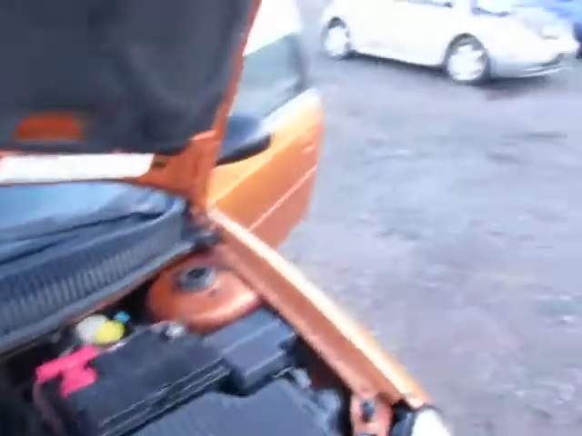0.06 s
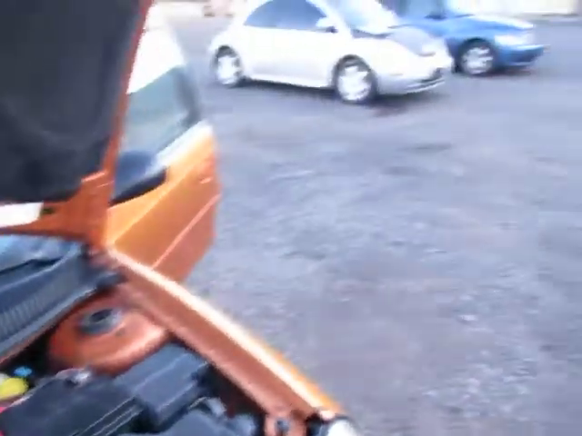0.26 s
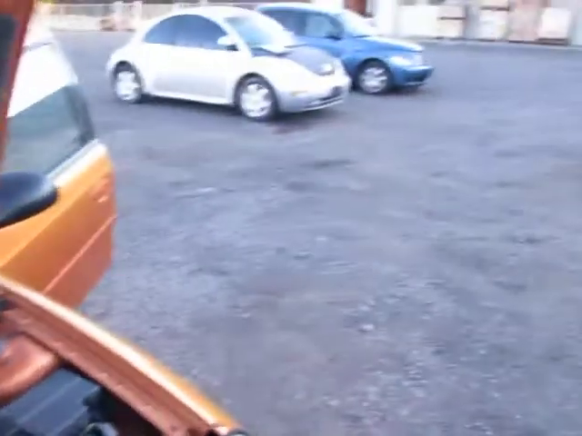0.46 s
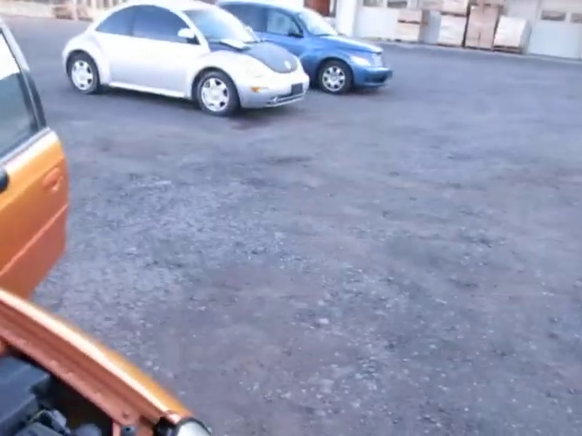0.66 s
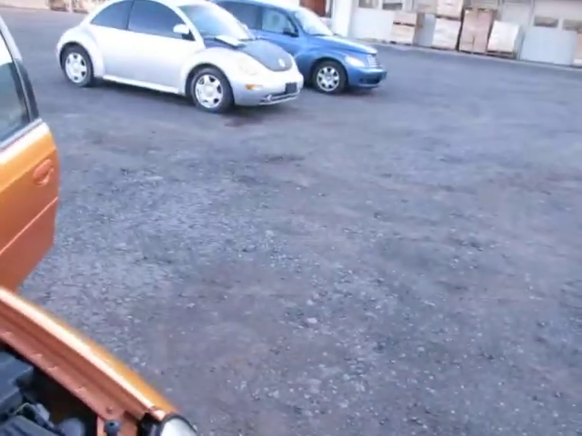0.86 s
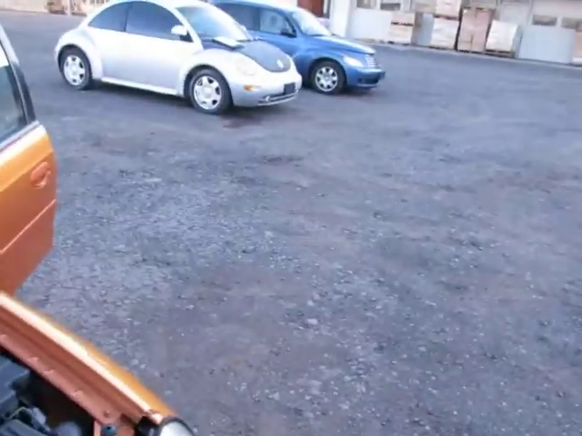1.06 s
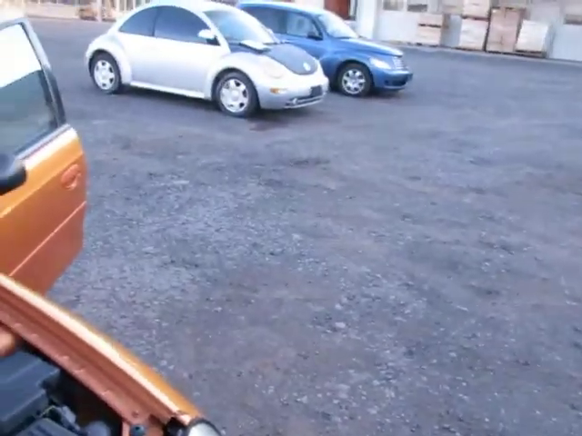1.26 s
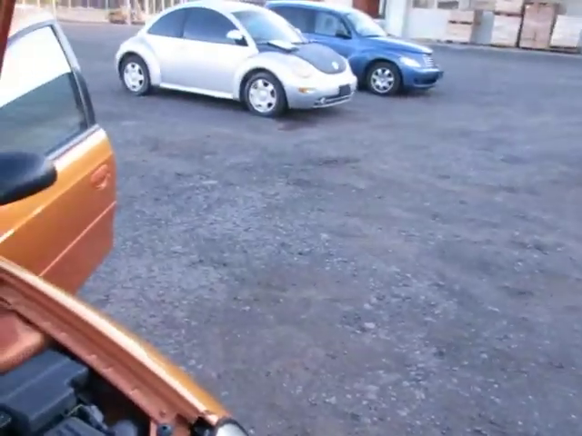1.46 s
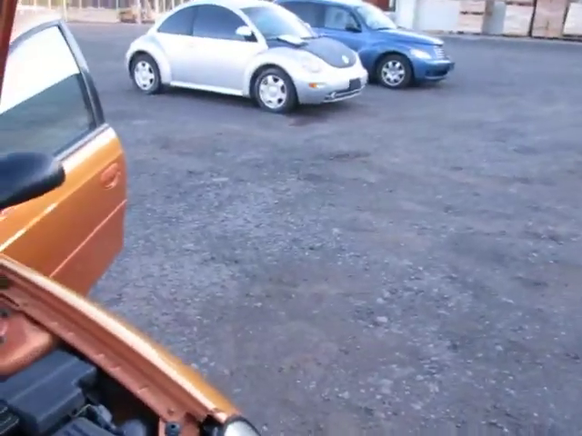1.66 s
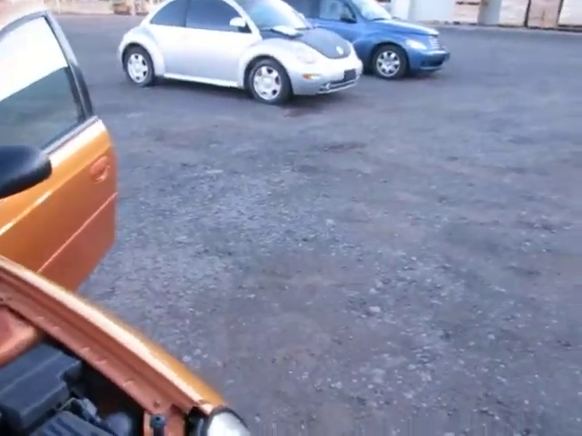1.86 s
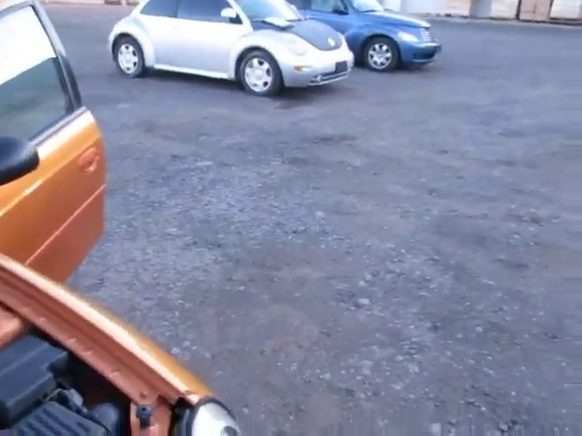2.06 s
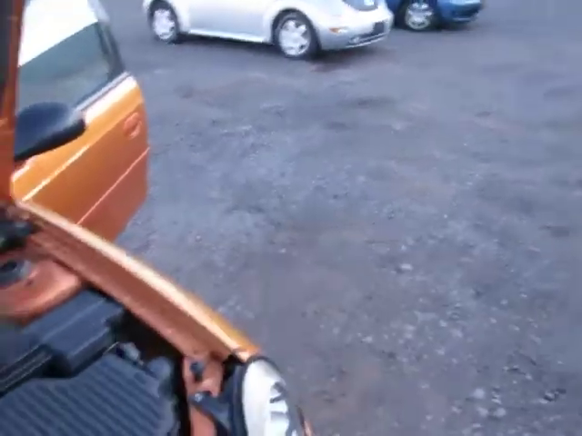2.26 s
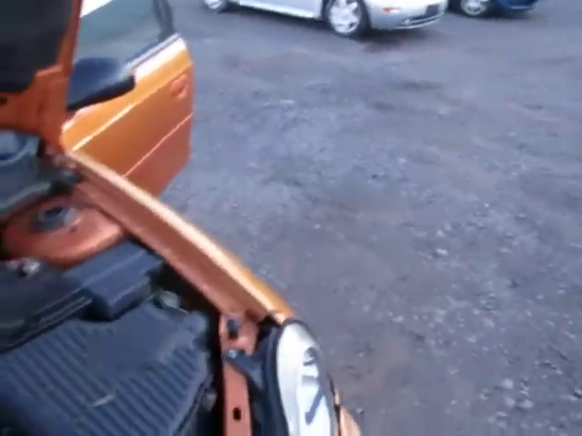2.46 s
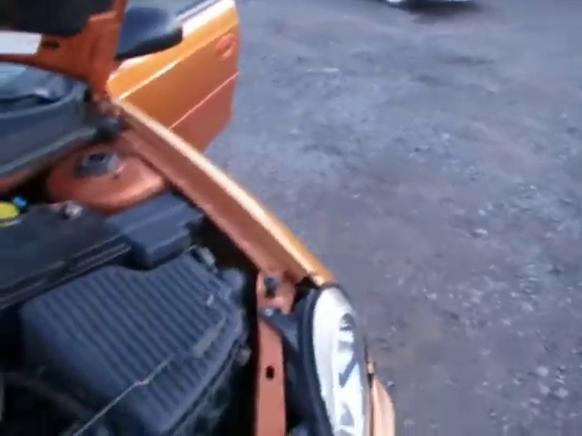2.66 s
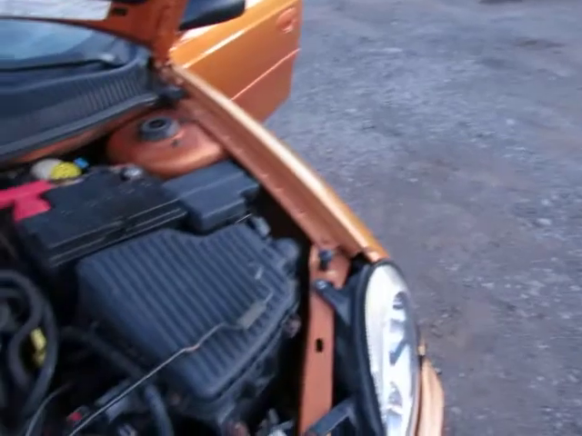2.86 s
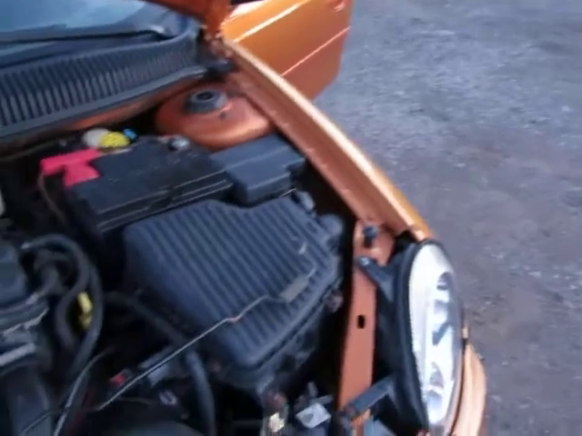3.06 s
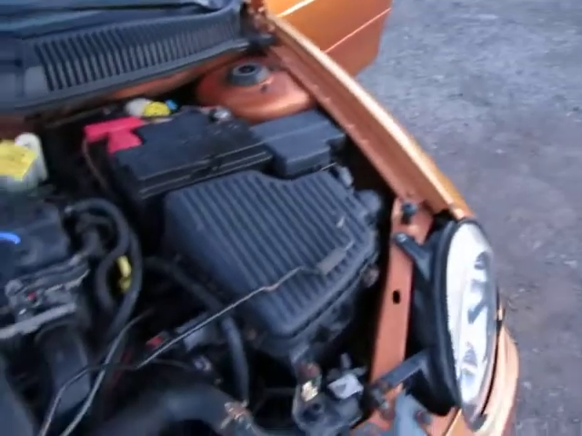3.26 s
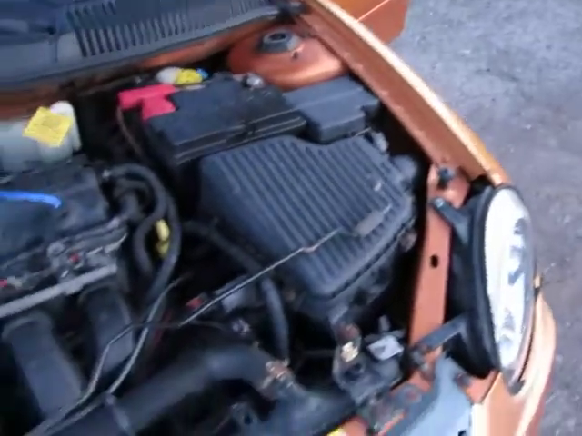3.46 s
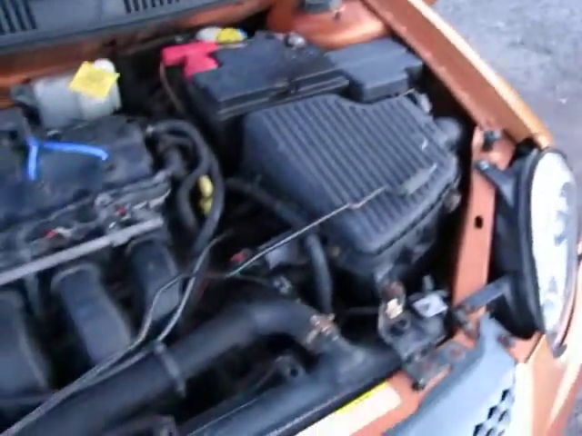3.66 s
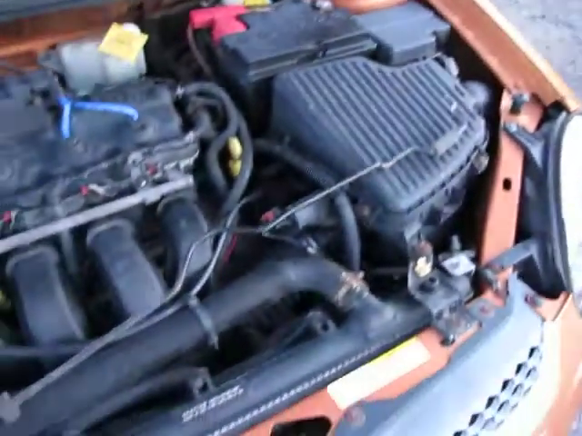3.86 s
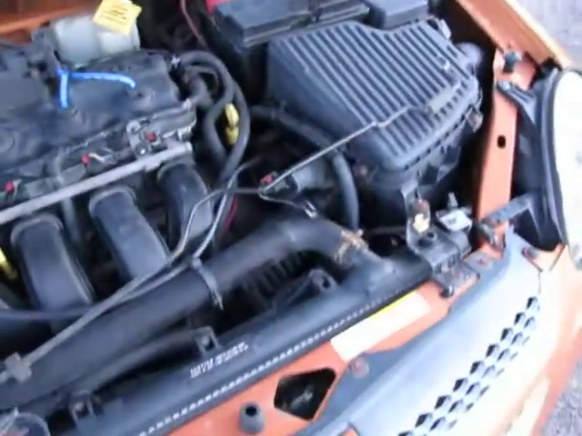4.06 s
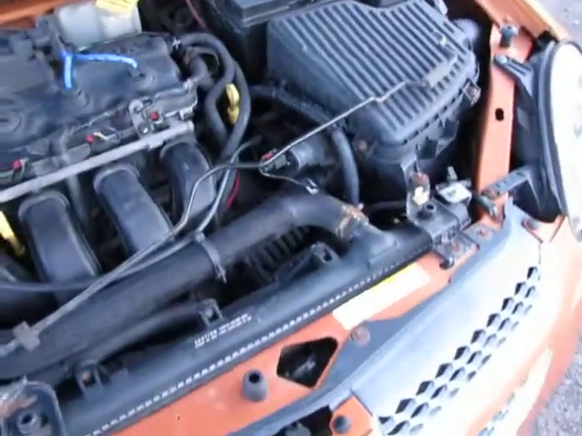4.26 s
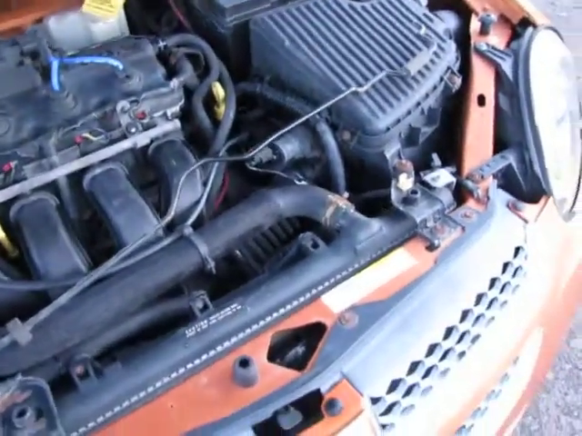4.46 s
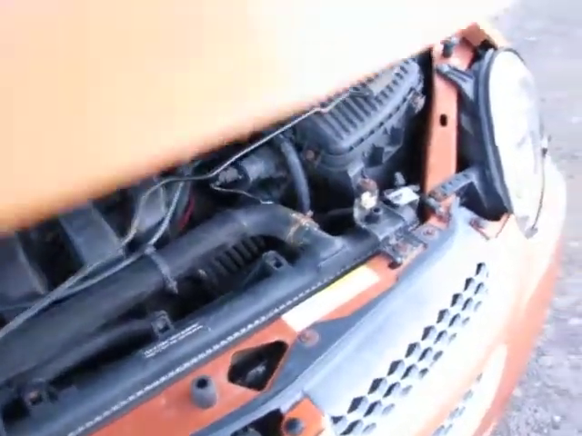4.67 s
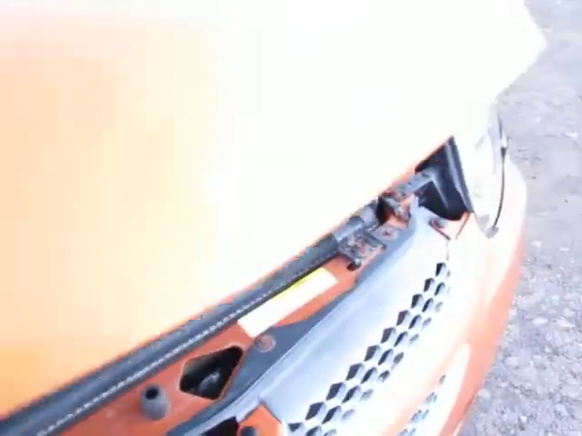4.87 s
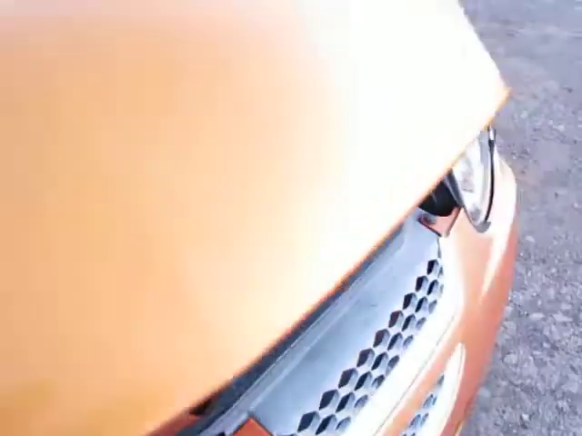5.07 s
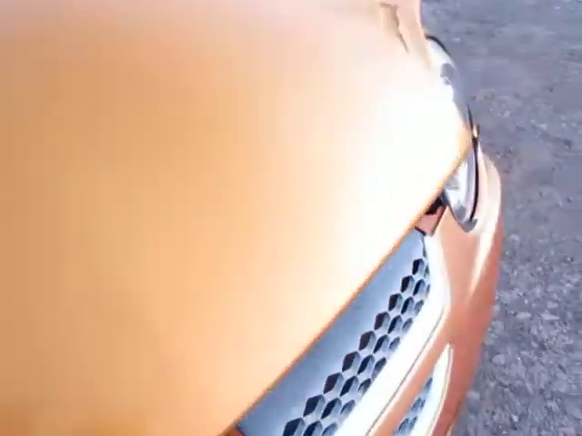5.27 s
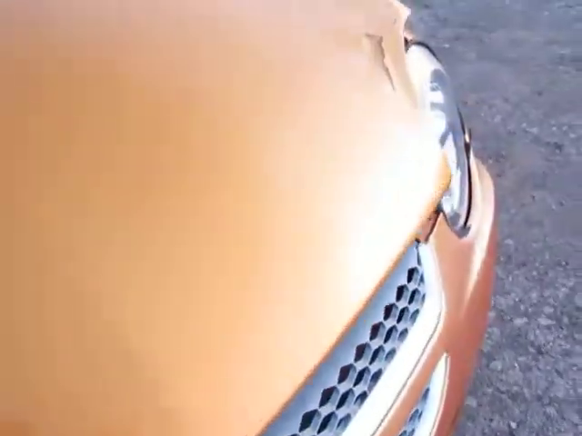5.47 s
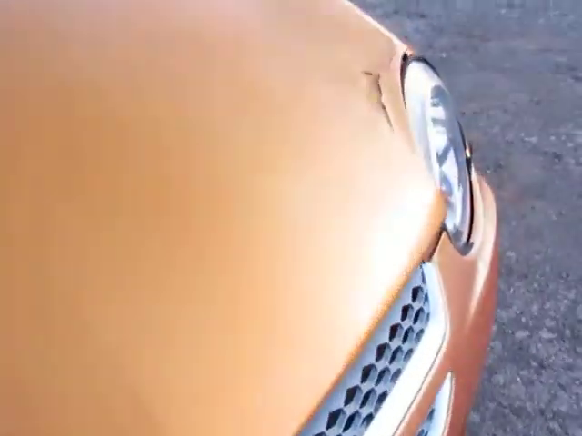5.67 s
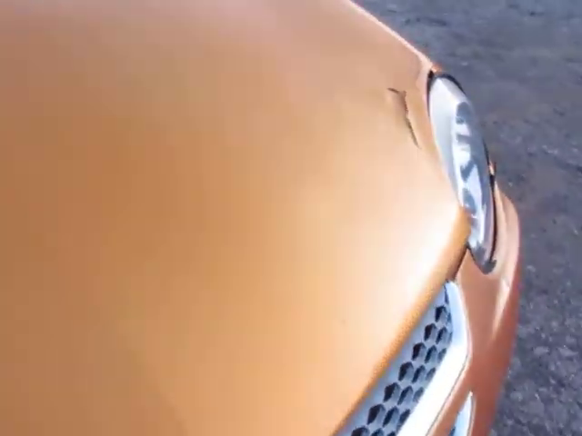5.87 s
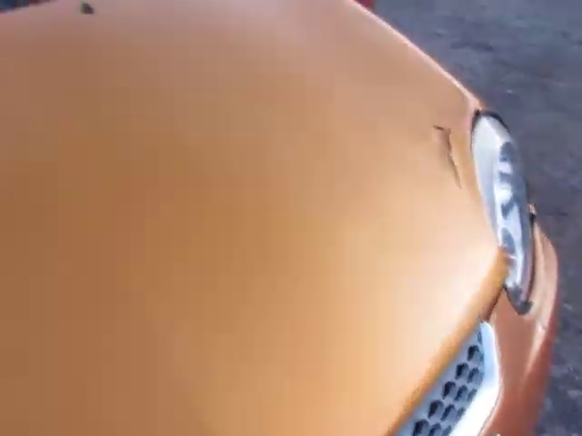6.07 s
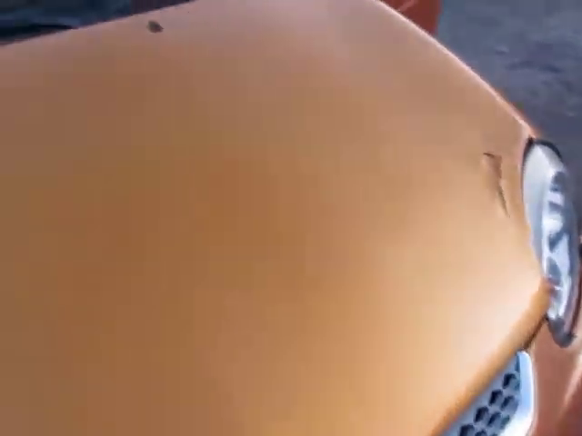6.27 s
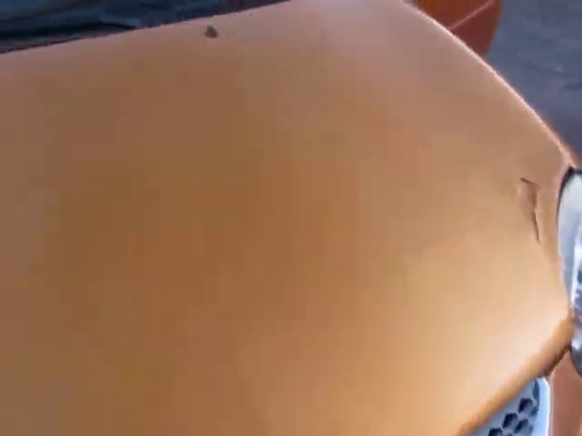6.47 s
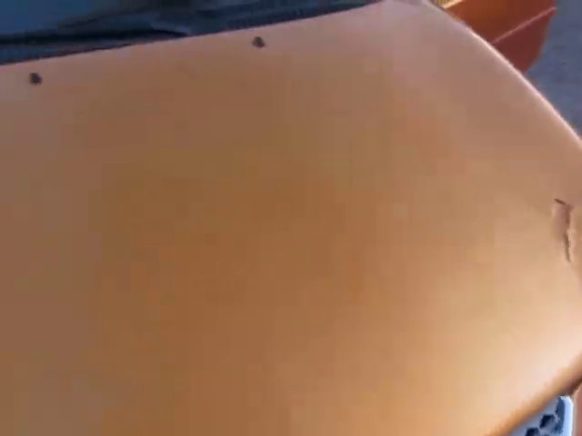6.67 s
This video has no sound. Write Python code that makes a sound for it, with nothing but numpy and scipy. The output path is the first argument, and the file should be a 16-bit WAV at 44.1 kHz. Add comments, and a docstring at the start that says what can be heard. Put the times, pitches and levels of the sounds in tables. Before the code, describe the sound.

Outdoors in a yard, a small four-cylinder engine idles steadily, close to a hand-held stereo microphone. Its rough, airy hum carries about 28 quick firing pulses a second, fine bright ticks, faint fan tones and soft exhaust throb, over uneven low rumble. A light hand knock comes at 0.7 s and a duller bump at 1.14 s. At 2.3 s the metal prop rod hits its holder with a sharp double clack, strikes again at 2.64 s and bounces faster and duller until about 2.95 s. The idle drops away at the clack, then climbs back over a second or so, ticks clearer facing the bay. Soft low knocks follow around 3.4-3.6 s. From 4.55 to 5 s the lowering bonnet muffles the engine. At 5.52-5.62 s it latches with rapid hard clacks and a hollow sheet-metal boom; the muffled idle dips deeply and is swelling back by 6.7 s.

```python
"""A four-cylinder engine idles in a yard: coloured noise, injector and valve ticks, fan tones, exhaust thumps.
Low rumble lies under it; hands knock and bump the hand-held camera, which turns from beside the bay to face it.
The bonnet prop drops into its holder and bounces: blows and rattle excite the rod's modes, with bright cracks.
The bonnet is lowered, muffling the engine, then latches with clacks and a boom.
At set times around the blows engine and rumble dip fast, then climb back steadily."""
import sys
import numpy as np
from scipy import signal
from scipy.fft import rfft, irfft, next_fast_len
from scipy.io import wavfile
from scipy.ndimage import uniform_filter1d, map_coordinates

SR = 44100
rng = np.random.default_rng(int(sys.argv[2]) if len(sys.argv) > 2 else 0)


def dump_mix(stems):
    """Bounce the given channels to the path in sys.argv[1] as a 16-bit WAV at rate SR."""
    frames = np.atleast_2d(stems).T  # one column per channel
    limited = np.clip(frames, -1, 1)  # hard clip at full scale
    pcm = np.round(limited * 32767).astype(np.int16)
    wavfile.write(sys.argv[1], SR, pcm)


def voltage_ratio(decibels):
    """Convert decibels (scalar or array-like) to amplitude ratios, 20 dB per decade."""
    exponent = np.asarray(decibels, float) / 20
    return 10 ** exponent


N = 296345
T = np.arange(N) / SR
FRAME, TOP_HZ = 1024, 16500

# camera and bonnet: (time [s], pose [0 beside bay, 1 facing it, 2 bonnet down, 3 latched])
POSE = [(0, 0), (2.3, .1), (2.6, .5), (3.5, .7), (4.0, 1), (4.55, 1), (4.78, 1.7), (5.0, 1.95), (5.45, 2),
        (5.8, 2.8), (6.1, 3), (6.72, 3)]
# microphone ports: (frequency [Hz], likeness [0-1], left lead beside bay [rad], left lead facing [rad],
# left over right beside bay [dB], left over right facing [dB])
PORTS = [(100, .4, 0, 0, 2, 0), (170, .9, 0, -.2, 2, 1), (400, .97, .3, .15, 2, 1),
         (1000, .88, 1.2, .3, 6.5, 2), (2000, .65, 1.6, .6, 6, 1), (2900, .5, 2.1, .9, 3.5, 0),
         (4000, .25, 2.6, .8, 4.5, 4), (5400, .3, 1.7, .5, 6.5, 5.5), (6700, .45, 2.6, 1, 7.5, 2),
         (8200, .5, 3, 1.8, 5, 1), (12000, .6, 3.8, 3, 2.5, 1), (14500, .5, 5.3, 4, 1.5, 0)]

# engine noise spectrum: (frequency [Hz], density in pose 0, 1, 2, 3 [dB, relative])
ENGINE_COLOUR = [(67, -20, -32, -28, -38), (123, -7, -4, -1.5, -1.5), (154, -1.5, -5, -6, -2),
                 (209, -7.5, -5, -3.5, -6), (364, -3.5, -1.5, 4, 1), (430, -6, -12, -7, -11.5),
                 (700, -9.5, -4.5, -6, -12), (880, -5, -8.5, -7, -8), (1690, -5.5, -3.5, -7, -8),
                 (2190, -10, -9, -12, -16), (2900, -13, -11, -12, -15), (3320, -12.5, -12, -11.5, -16),
                 (4320, -16.5, -14.5, -19.5, -23), (6370, -18.5, -16, -23, -26.5),
                 (8240, -18.5, -16.5, -25, -29.5), (9200, -23, -18.5, -27, -34),
                 (11700, -24.5, -20.5, -32, -35), (12400, -25.5, -17.5, -23, -32),
                 (14600, -27, -25, -32, -38), (17200, -43, -43, -41, -46)]
# hollows of intake and bay: (frequency [Hz], width [Hz], boost with bonnet open [dB])
BAY_HOLLOWS = [(264, 19, 5.5), (1148, 30, 10), (1241, 38, 6.5), (1474, 31, 8.5), (1593, 22, 6),
               (1534, 51, 3), (6880, 120, 5)]
# gain on all engine parts: (pose 0, 1, 2, 3 [dB])
ENGINE_POSE_DB = [-22, -23, -29, -29]
# injector ticks: (strength of each cylinder [dB, relative])
INJECTOR_DB = [11, 4, 5, 7]
# injector tick filter: (frequency [Hz], gain [dB])
INJECTOR_COLOUR = [(3000, -40), (7000, -28), (10000, -5), (13000, -1.5), (15500, -24)]
# valve seat filter: (frequency [Hz], gain [dB])
VALVE_COLOUR = [(1200, -30), (2500, 17), (5000, -3.5), (8000, 4), (12000, -23), (16000, -34)]
# fan blade tones and a belt-drive whine: (frequency [Hz], level [dB, before the pose gains])
FAN_TONES = [(175.7, -10), (352.5, -17), (527.3, -13.5), (703, -18.5), (1126, -19.5)]
# gain on the fan tones: (pose 0, 1, 2, 3 [dB])
FAN_POSE_DB = [-0.5, 1, 5.5, 1]

# air and hands at the ports: (time [s], level [dB, before a 13.5 dB lift])
RUMBLE_LEVEL = [(0, -53), (.5, -78), (1.1, -40.5), (1.7, -60), (2.4, -55), (3.6, -40), (4.1, -50),
                (4.8, -54), (5.45, -43), (6.0, -41), (6.72, -48)]
# rumble filter: (frequency [Hz], gain [dB])
RUMBLE_COLOUR = [(18, -25), (30, -23), (45, -4.5), (90, -5.0), (130, -12.5), (200, -67)]
# opposed share of the rumble: (pose 0, 1, 2, 3 [ratio])
RUMBLE_OPPOSED = [0.23, 0.97, 0.3, 0.63]

# hand knocks, and extra low, ringing or snapping bands within the rod and latch blows:
# (time [s], level [dB, relative], frequency [Hz], t60 [s])
KNOCK_BANDS = [(.704, -17, 620, .098), (2.302, -17.5, 694, 0.33), (2.348, 3, 2080, .014),
               (2.66, -34, 880, 0.45), (2.947, -30, 750, 0.28), (3.414, -12, 110, 0.2),
               (3.56, -16, 93, 0.18), (5.466, -38, 248, .26), (5.6192, -25.5, 3900, 0.04),
               (5.665, -47.5, 7000, .12)]
# bands of a hand bump on the camera: (frequency [Hz], level [dB, relative], t60 [s])
BUMP_BANDS = [(130, -12, 0.46), (330, -15, 0.34), (626, -13, 0.1), (3970, -20, .03)]
# bonnet sheet after each latch contact: (frequency [Hz], level [dB re the contact's ring column], t60 [s])
BOOM_BANDS = [(94, -18, .25), (320, -18, .75), (620, -19, .45)]
# dips of engine and rumble: (time [s], further depth [dB])
DIPS = [(.72, 2.5), (1.14, 5), (2.3, 6), (2.348, 20), (2.65, 1.5), (2.77, 1.5), (5.57, 21)]

# prop rod strikes: (time [s], ring [dB, relative], crack [dB, relative])
ROD_STRIKES = [(2.297, -19, 0), (2.3471, -1, 1.5), (2.644, -3.5, -0.5)]
# prop rod decay: (ring t60 [s], crack t60 [s])
ROD_T60_S = [.04, .02]
# prop rod modes: (frequency [Hz], width [Hz], gain [dB])
ROD_MODES = [(225, 49, -2.5), (415, 130, -7.5), (656, 52, 2.5), (828, 95, -1.5), (1065, 74, -2.5),
             (1720, 170, -7.5), (2200, 310, -13), (2920, 230, -12.5), (4500, 170, -26), (5970, 390, -35)]
# bonnet latch contacts: (time [s], ring [dB, relative], crack [dB, relative])
LATCH_CONTACTS = [(5.523, -5, -0.5), (5.5597, -11.5, -6.5), (5.565, -9.5, 0), (5.581, -15, -14),
                  (5.596, -27, -39), (5.6191, -19, -17.5)]
# latch decay: (ring t60 [s], crack t60 [s])
LATCH_T60_S = [0.082, 0.039]
# bonnet modes: (frequency [Hz], width [Hz], gain [dB])
BONNET_MODES = [(167, 46, -1), (263, 54, -15), (380, 37, 0.5), (563, 32, -12), (727, 16, 7.5),
                (1180, 110, -2.5), (2900, 290, -7), (3960, 330, -8.5), (6000, 190, -17), (8600, 340, -34)]

CYCLE_S, FIRST_TICK_S, HUNT_S = .14132, .111, .002  # engine cycle, a tick of the loudest injector, idle wander
FACING_TICK_DB = 4.5  # ticks stand out more facing the bay
BUMP_S = 1.1375
DIP_FALL_S, BONNET_DIP_FALL_S = .035, .055
RETURN_DB_PER_S, RETURN_KNEE_DB = 22.5, 6  # climb back, rounding near full level
FLIGHT_S, FLIGHT_RATIO = .125, .665  # first bounce, next flight over the last
BOUNCE_RING_LOSS_DB, BOUNCE_CRACK_LOSS_DB = 5.5, 13.5
REBOUND_S, REBOUND_RING_DB, REBOUND_CRACK_DB = .008, -6.5, -27  # second touch in the holder, dull
CHATTER_S, CHATTER_DB = .026, -21  # free end taps after a hard contact


def unit(x):
    """Bring to rms 1."""
    return x / np.sqrt(np.mean(x ** 2) + 1e-20)


def along(points, hz, axis=1):
    """One column of a table, interpolated on a log frequency axis."""
    table = np.array(points)
    return np.interp(np.log(hz + 1), np.log(table[:, 0] + 1), table[:, axis])


def curve(rows, t=T):
    """Straight lines through (time [s], value) rows."""
    return np.interp(t, *np.transpose(rows))


def by_pose(values):
    """Interpolate four pose values over time."""
    return np.interp(curve(POSE), range(4), values)


def wobble(rate):
    """Smooth random curve, rate knots a second."""
    knots = rng.standard_normal(int(N * rate / SR) + 4)
    return map_coordinates(knots, [T * rate])


def filtered(x, response):
    """Apply a complex response of frequency."""
    m = next_fast_len(N + SR // 2)
    return irfft(rfft(x, m) * response(np.fft.rfftfreq(m, 1 / SR)), m)[..., :N]


def ports(near, diffuse, turned=None):
    """Two ports: a shared part whose lead and balance change with the turn, plus an unlike part."""
    hz, t, (shared, unlike) = signal.stft([near, diffuse], SR, nperseg=FRAME)
    turned = np.clip(curve(POSE, t), 0, 1.25) if turned is None else turned + 0 * t

    def blend(aside, facing):
        return aside[:, None] + (facing - aside)[:, None] * turned

    lead_rad = blend(along(PORTS, hz, axis=2), along(PORTS, hz, axis=3))
    tilt_db = blend(along(PORTS, hz, axis=4), along(PORTS, hz, axis=5))
    angle = np.arccos(np.clip(along(PORTS, hz), 0, 1))[:, None] / 2  # cos(2 angle) = likeness
    half = voltage_ratio(tilt_db / 2) * np.exp(.5j * lead_rad)
    left = (np.cos(angle) * shared + np.sin(angle) * unlike) * half
    right = (np.cos(angle) * shared - np.sin(angle) * unlike) / half
    return signal.istft(np.array([left, right]), SR, nperseg=FRAME)[1][:, :N]


def cycles():
    """Engine cycles (four firings each) completed at a slightly wandering idle."""
    return (T - FIRST_TICK_S + HUNT_S * wobble(1.5)) / CYCLE_S


def roar(firing, patchy_db=1.0, throb_db=1.0):
    """Valve gear, belts and fan air: patchy noise in the bay's hollows, treble beating with the firings."""
    hz, t, z = signal.stft(rng.standard_normal((2, N)), SR, nperseg=2 * FRAME)
    pose = np.clip(curve(POSE, t), 0, 3)
    colour_db = sum(along(ENGINE_COLOUR, hz, axis=k + 1)[:, None] * np.clip(1 - abs(pose - k), 0, 1)
                    for k in range(4))
    hollows_db = sum(db / (1 + (2 * (hz - c) / w) ** 2) for c, w, db in BAY_HOLLOWS)
    bonnet_open = 1 - 0.37 * np.clip(pose - 1, 0, 2)
    gain = voltage_ratio(colour_db + hollows_db[:, None] * bonnet_open)
    middle = (hz > 900) & (hz < 2200)
    gain = gain / np.sqrt(np.sum(gain[middle] ** 2, axis=0) / len(hz))  # this band to about rms 1
    field = uniform_filter1d(rng.standard_normal(gain.shape), size=8, axis=0)
    field = uniform_filter1d(field, size=4, axis=1)
    patches = voltage_ratio(patchy_db * unit(field))
    noise = signal.istft(z * gain * patches, SR, nperseg=2 * FRAME)[1][:, :N]
    treble = filtered(noise, lambda f: 1 / (1 + (3000 / (f + 1)) ** 4))
    beat = voltage_ratio(throb_db * np.cos(2 * np.pi * firing) + 0.4 * wobble(7.5)) - 1
    return noise + beat * treble


def ticks(turns, count, size_db, scatter_db, t60, colour, hidden_db):
    """Short coloured noise bursts, count per engine cycle, weakened by the bonnet."""
    strokes = np.flatnonzero(np.diff(np.floor(count * turns)) > 0)
    which = np.round(count * turns[strokes]).astype(int) % len(size_db)
    level_db = np.array(size_db)[which] + scatter_db * rng.standard_normal(len(strokes))
    pose = curve(POSE, strokes / SR)
    pose_db = FACING_TICK_DB * np.clip(pose, 0, 1) - hidden_db * np.clip(pose - 1, 0, 2)
    kicks = np.zeros(N)
    kicks[strokes] = voltage_ratio(level_db + pose_db)
    envelope = signal.fftconvolve(kicks, voltage_ratio(-60 * T[:SR // 20] / t60))[:N]
    return filtered(envelope * rng.standard_normal((2, N)), lambda f: voltage_ratio(along(colour, f)))


def injectors(turns):
    """One injector tick per firing, one cylinder louder."""
    return ticks(turns, count=4, size_db=INJECTOR_DB, scatter_db=2.5, t60=0.006,
                 colour=INJECTOR_COLOUR, hidden_db=13)


def valves(turns):
    """Sixteen valves seat at uneven times in each cycle."""
    return ticks(turns + .012 * wobble(60), count=16, size_db=[-5], scatter_db=1.5, t60=0.012,
                 colour=VALVE_COLOUR, hidden_db=5.5)


def fan_tones():
    """Fan blade and belt tones, wavering together in pitch and singly in level."""
    drift = 1 + 0.001982 * wobble(3) + .0025 * wobble(25)
    seconds = np.cumsum(drift) / SR
    fan = sum(voltage_ratio(db + 2.17 * wobble(7.6)) * np.sin(2 * np.pi * hz * seconds) for hz, db in FAN_TONES)
    return voltage_ratio(by_pose(FAN_POSE_DB)) * fan


def exhaust(firing):
    """Thumps at the firing rate and its octave, out of phase between the ports."""
    lift_db = 3.24 * np.clip(curve(POSE) - 1, 0, 2)  # low tones pass the bonnet better than the midrange
    level = voltage_ratio(-15.5 + lift_db + 3.5 * wobble(5.0))
    thump = np.sin(2 * np.pi * firing - np.array([[0], [1.6]]))
    octave = voltage_ratio(-1.5) * np.sin(2 * 2 * np.pi * firing - np.array([[0], [1.9]]))
    return level * (thump + octave) * voltage_ratio([[1.2], [-1.2]])


def engine():
    """All engine parts share one gain, set by the pose; ticks, roar and thumps follow one cycle count."""
    turns = cycles()
    near, diffuse = roar(4 * turns) + injectors(turns) + valves(turns)
    parts = ports(near + fan_tones(), diffuse) + exhaust(4 * turns)
    return voltage_ratio(by_pose(ENGINE_POSE_DB)) * parts


def rumble():
    """Low buffeting, partly opposed at the two ports by a share that follows the pose."""
    noise = filtered(rng.standard_normal((2, N)), lambda f: voltage_ratio(along(RUMBLE_COLOUR, f)))
    push, common = unit(noise[0]), .45 * unit(noise[1])
    lumps = voltage_ratio(curve(RUMBLE_LEVEL) + 13.5 + 1.24 * wobble(6.3))
    return lumps * np.array([push + common, -by_pose(RUMBLE_OPPOSED) * push + common])


def thuds(width=0.4):
    """Hand knocks and bump, extra bands of the rod and latch blows, bonnet boom: dying noise in broad bands."""
    out, t = np.zeros((2, N + SR)), T[:SR // 2]
    bump = [(BUMP_S, db, hz, t60) for hz, db, t60 in BUMP_BANDS]
    boom = [(s, ring_db + db, hz, t60) for s, ring_db, _ in LATCH_CONTACTS for hz, db, t60 in BOOM_BANDS]
    for s, db, hz, t60 in KNOCK_BANDS + bump + boom:
        band = signal.butter(2, [hz / (1 + width), hz * (1 + width)], "band", fs=SR, output="sos")
        body = unit(signal.sosfilt(band, rng.standard_normal(len(t))))
        burst = voltage_ratio(db - 60 * t / t60) * (1 - np.exp(-t * hz)) * body
        opposed = hz < 200 and s < 5  # through the camera body
        start = round(s * SR)
        out[:, start:start + len(t)] += burst * np.array([[1.3], [-.7 if opposed else .8]])
    return out[:, :N]


def dips():
    """Gain pushed further down at each listed time; it climbs at a steady dB rate and rounds off."""
    down_db = np.zeros(N)
    for s, depth_db in DIPS:
        after = np.clip(T - s, 0, None)
        start = np.expm1((down_db[round(s * SR)] + depth_db) / RETURN_KNEE_DB)
        left = start * np.exp(-after * RETURN_DB_PER_S / RETURN_KNEE_DB)
        fall_s = BONNET_DIP_FALL_S if s > LATCH_CONTACTS[0][0] else DIP_FALL_S
        fall = 1 - np.exp(-(after / fall_s) ** 2)
        down_db = down_db + fall * (RETURN_KNEE_DB * np.log1p(left) - down_db)
    return voltage_ratio(-down_db)


def resonances(modes):
    """Causal response of a sum of modes, alternating in sign."""
    def response(f):
        return sum((-1) ** k * voltage_ratio(db) * 1j * f * w / (c * c - f * f + 1j * f * w)
                   for k, (c, w, db) in enumerate(modes))
    return response


def clatter(contacts, t60s, modes, bright_hz, blow_db, turned):
    """Each contact: a sharp blow and short rattle into the part's modes, and a bright crack."""
    rattle, crack, t = np.zeros((2, N + SR)), np.zeros((2, N + SR)), T[:SR // 2]
    ring_t60, crack_t60 = t60s
    for s, ring_db, crack_db in contacts:
        span = slice(round(s * SR), round(s * SR) + len(t))
        rattle[:, span] += voltage_ratio(ring_db + 10 - 60 * t / ring_t60) * rng.standard_normal((2, len(t)))
        rattle[0, span.start] += voltage_ratio(ring_db + blow_db)  # the blow, in the near part only
        crack[:, span] += voltage_ratio(crack_db - 60 * t / crack_t60) * rng.standard_normal((2, len(t)))

    def bright(f):
        return (1j * f / 1300) / (1 + 1j * f / 1300) / (1 + 1j * f / bright_hz) ** 2

    near, diffuse = filtered(rattle[:, :N], resonances(modes)) + filtered(crack[:, :N], bright)
    return ports(near, 1.05 * diffuse, turned)


def rod_contacts():
    """Strikes, ever quicker and duller bounces, second touches, and taps after the hard contacts."""
    s, ring_db, crack_db = ROD_STRIKES[-1]
    bounces = [(s + FLIGHT_S * (1 - FLIGHT_RATIO ** k) / (1 - FLIGHT_RATIO),
                ring_db - BOUNCE_RING_LOSS_DB * k,
                crack_db - BOUNCE_CRACK_LOSS_DB * k) for k in range(1, 5)]
    rebounds = [(s + REBOUND_S, ring_db + REBOUND_RING_DB, crack_db + REBOUND_CRACK_DB)
                for s, ring_db, crack_db in ROD_STRIKES[-1:] + bounces]
    hard = ROD_STRIKES[1:] + bounces[:1]
    taps = [(s + CHATTER_S, ring_db + CHATTER_DB, ring_db + CHATTER_DB) for s, ring_db, _ in hard]
    return ROD_STRIKES + bounces + rebounds + taps


def prop_rod():
    """The prop rod drops into its holder and its modes ring."""
    return clatter(rod_contacts(), ROD_T60_S, ROD_MODES, bright_hz=6400, blow_db=20.5, turned=0.5)


def bonnet_latch():
    """The latch contacts excite the bonnet's modes."""
    return clatter(LATCH_CONTACTS, LATCH_T60_S, BONNET_MODES, bright_hz=7450, blow_db=28, turned=1.76)


def scene():
    """Dipping engine and rumble, with undipped blows and handling."""
    steady = dips() * (engine() + rumble())
    return steady + thuds() + prop_rod() + bonnet_latch()


def roll_off(x):
    """The treble ends steeply here."""
    return signal.sosfilt(signal.butter(12, 16550, fs=SR, output="sos"), x)


def record(dry):
    """Peaks clip softly; nothing passes above the band limit."""
    clipped = dry / (1 + abs(dry) ** 8) ** (1 / 8)
    limited = filtered(clipped, lambda f: f < TOP_HZ)
    return roll_off(limited)


dry = scene()
out = record(dry)
dump_mix(out)
```